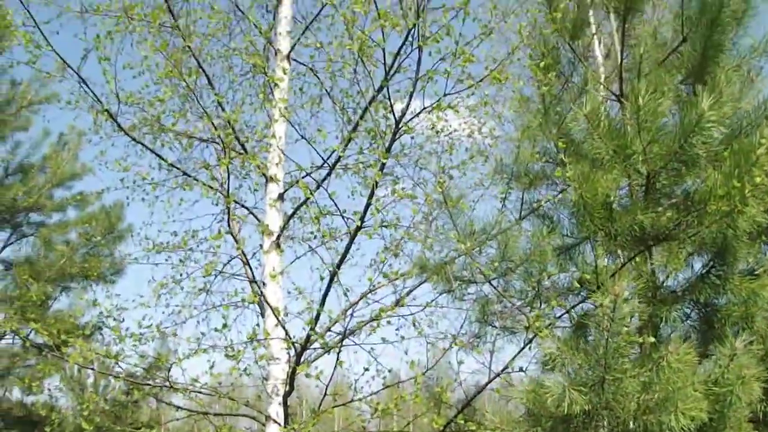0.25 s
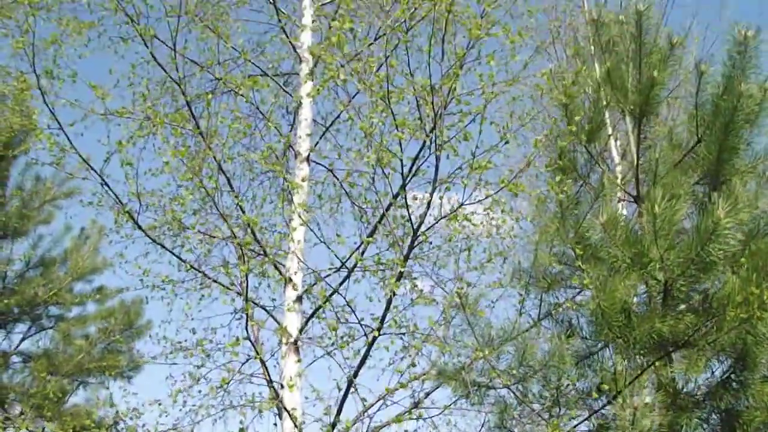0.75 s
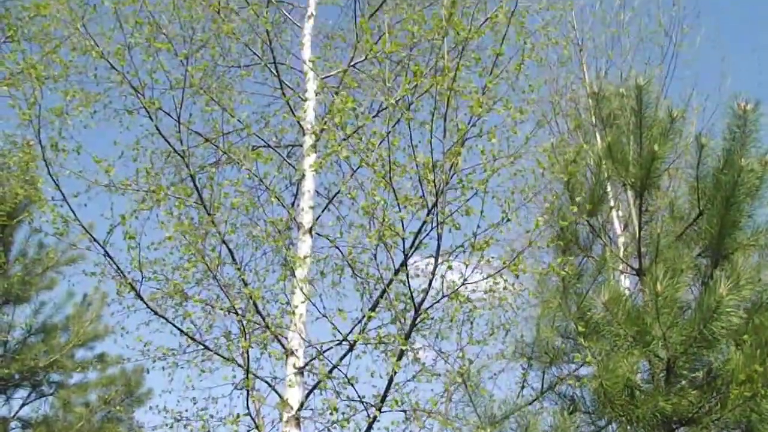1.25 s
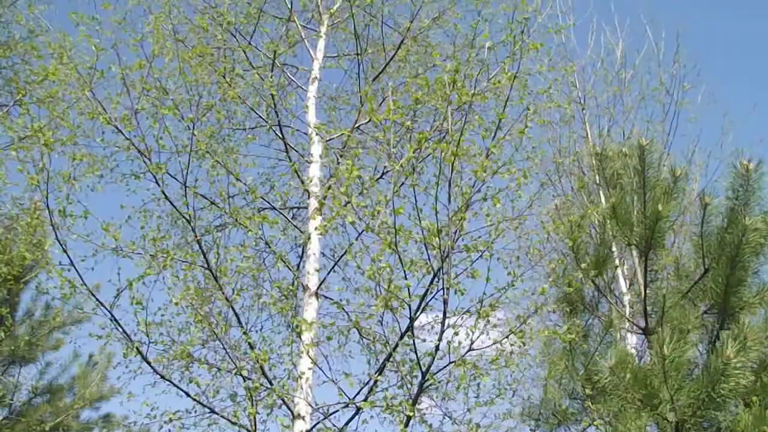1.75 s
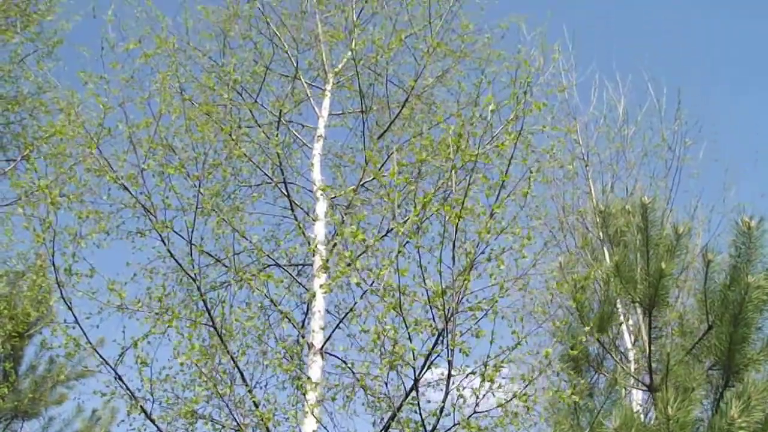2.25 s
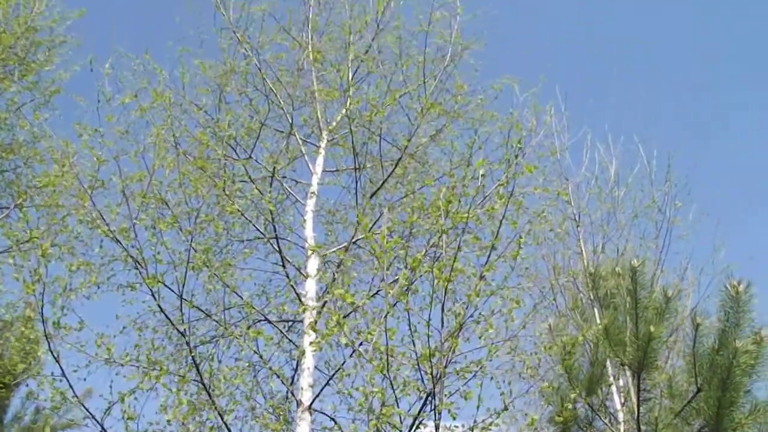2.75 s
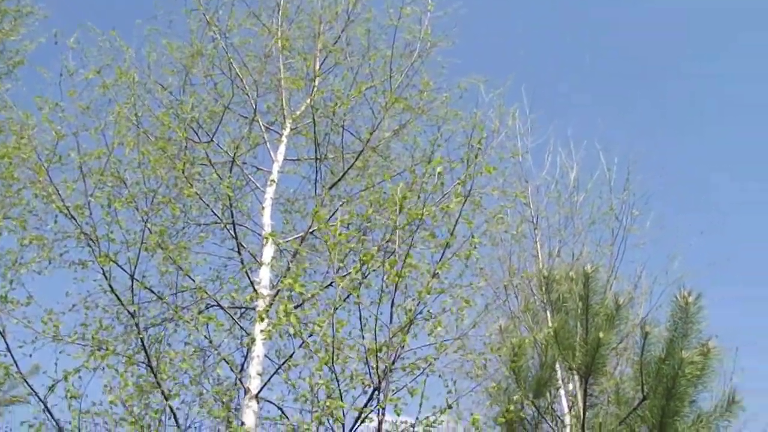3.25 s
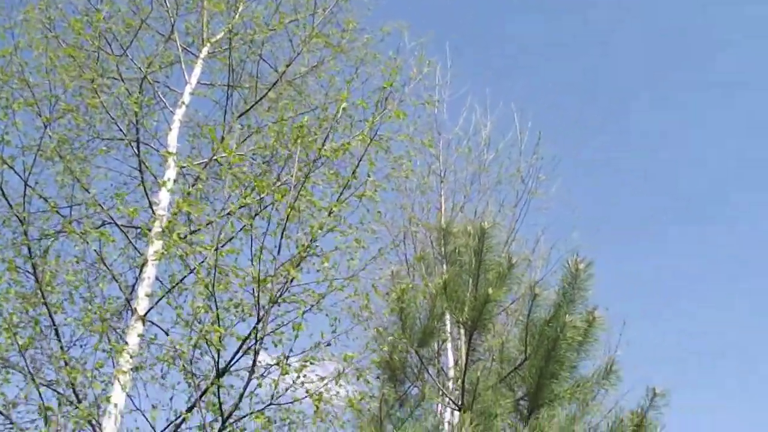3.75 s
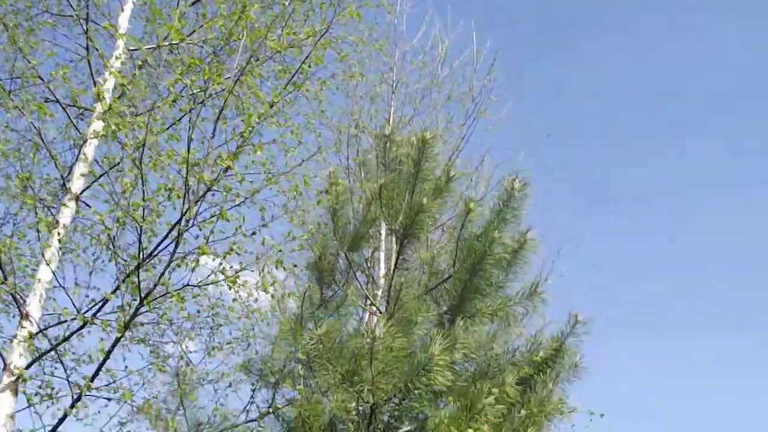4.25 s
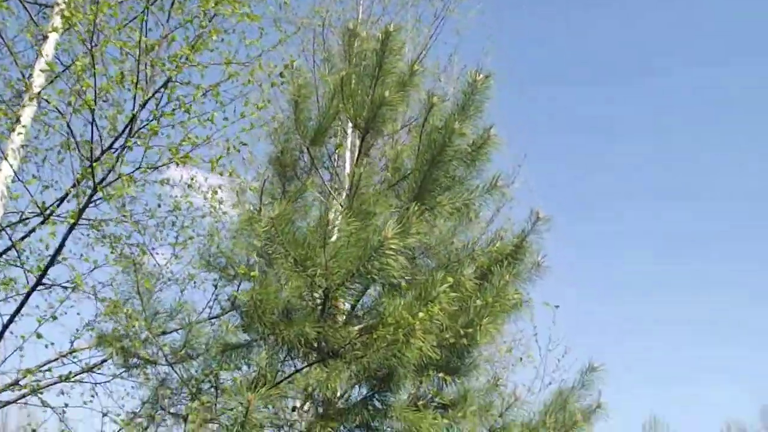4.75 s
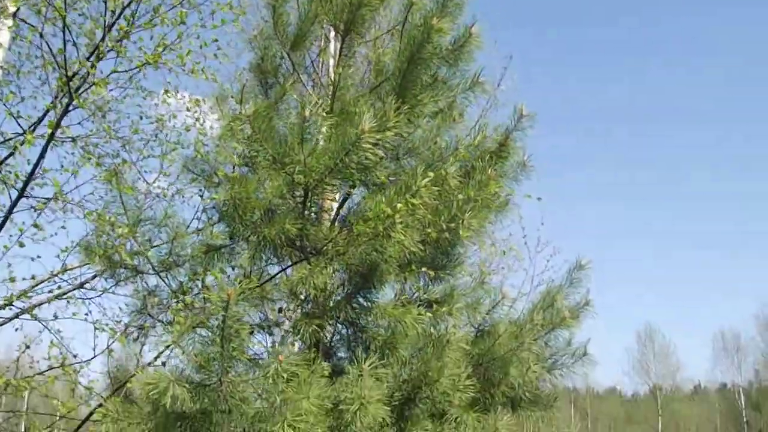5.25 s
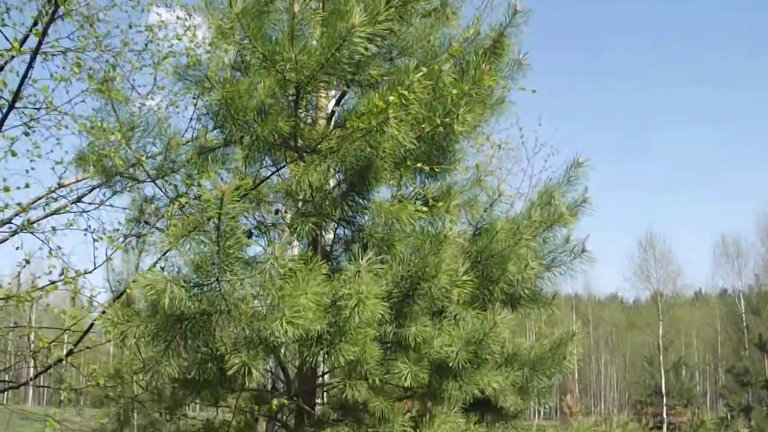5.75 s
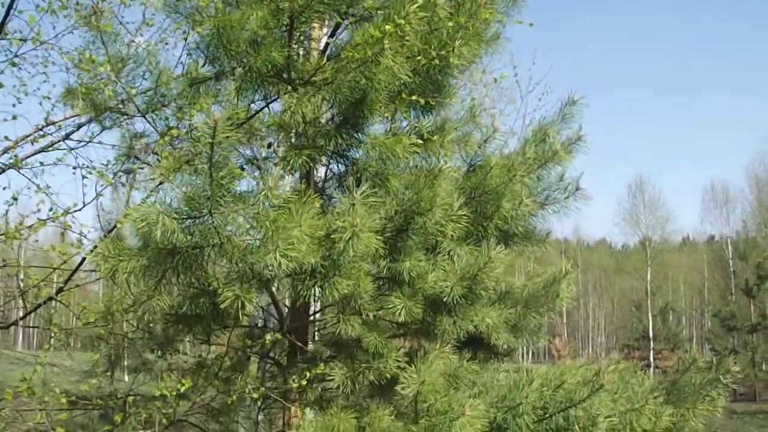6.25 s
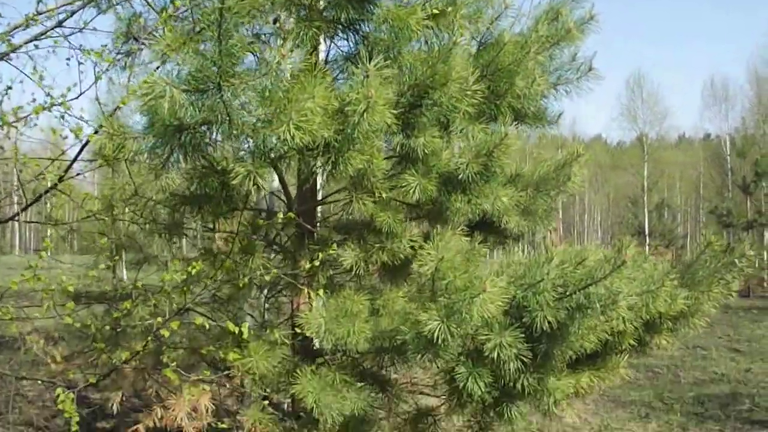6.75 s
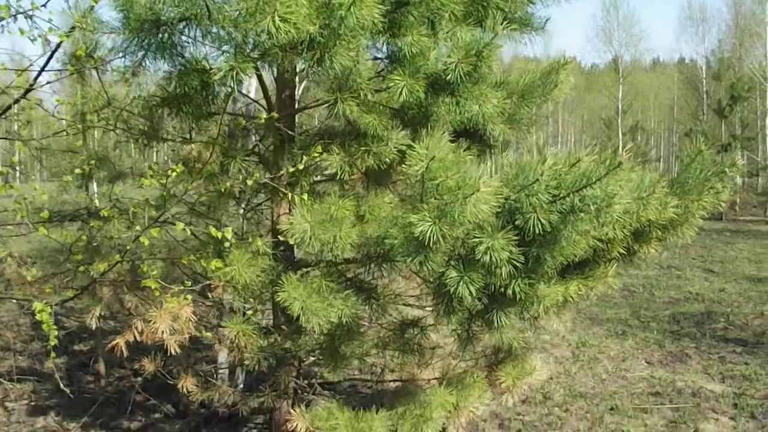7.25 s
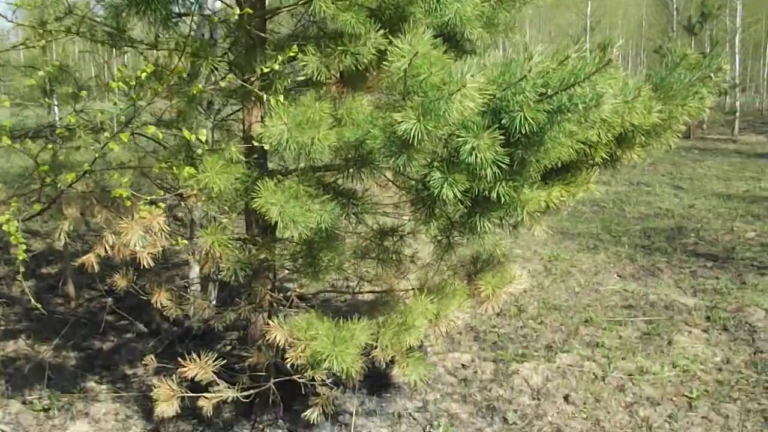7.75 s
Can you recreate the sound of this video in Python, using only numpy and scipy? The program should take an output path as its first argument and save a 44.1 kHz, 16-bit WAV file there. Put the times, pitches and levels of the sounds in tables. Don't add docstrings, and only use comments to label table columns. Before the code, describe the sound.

In open spring woodland, a small camera's drive whirrs continuously right at the microphone, with faint low servo hum in surges and soft hiss. Several sharp plastic snaps come early, the last one loudest. Then a distant warbler whistles a rippling, generally falling phrase for about three seconds. Afterwards only the whirr and small finger ticks remain.

```python
import sys
import numpy as np
from scipy import signal
from scipy.fft import rfft, irfft
from scipy.io import wavfile
from scipy.ndimage import uniform_filter1d, map_coordinates

SR = 44100
rng = np.random.default_rng(int(sys.argv[2]) if len(sys.argv) > 2 else 0)


def store_pcm(level_fs):
    pcm = np.round(np.clip(level_fs, -1, 1) * 32767).astype(np.int16)
    wavfile.write(sys.argv[1], SR, np.atleast_2d(pcm).T)


def gain_from_db(level_db):
    decades = np.asarray(level_db, float) / 20
    return 10 ** decades


N = 353241


def unit(x):
    return x / np.sqrt(np.mean(x ** 2) + 1e-20)


def curves(rows):
    s, *columns = np.transpose(rows)
    return [np.interp(np.arange(N) / SR, s, column) for column in columns]


def wobble(rate):
    knots = rng.standard_normal(int(N * rate / SR) + 4)
    return map_coordinates(knots, [np.arange(N) * rate / SR])


def add(track, start_s, sound):
    spot = track[round(start_s * SR):][:len(sound)]
    spot += sound[:len(spot)]


def colour(hz, tilt, modes):
    tilt_hz, tilt_db = np.transpose(tilt)
    slope_db = np.interp(np.log(hz + 1), np.log(tilt_hz), tilt_db, right=-120)
    bells_db = sum(db / (1 + (2 * (hz - centre) / width) ** 2) for centre, width, db in modes)
    return gain_from_db(slope_db + bells_db)


def patchy(depth_db):
    z = signal.stft(rng.standard_normal(N), nperseg=512)[2]
    field = uniform_filter1d(rng.standard_normal(z.shape), size=6, axis=0)
    field = uniform_filter1d(field, size=8, axis=1)
    return signal.istft(z * gain_from_db(depth_db * unit(field)), nperseg=512)[1][:N]


# pitch_hz, level_db [dB per Hz]
HISS_SLOPE = [(15, -5), (60, 1.5), (110, -8), (300, -11), (600, -15.5), (2000, -23), (5500, -19.5),
              (8000, -19), (9500, -23), (10000, -26), (14500, -27.5), (15700, -27), (20000, -45)]
# pitch_hz, width_hz, level_db
HISS_HUMPS = [(6600, 550, 3), (6800, 400, 0.5), (9300, 310, 6), (6480, 130, -6), (8700, 400, 0.5)]


def hiss():
    hz = np.fft.rfftfreq(N, 1 / SR)
    floor = irfft(rfft(patchy(depth_db=0.7)) * colour(hz, HISS_SLOPE, HISS_HUMPS), N)
    return gain_from_db(-54) * unit(floor)


LINE_HZ = [29.6, 224.8, 2005.3, 6016.2, 8021.4, 10828.8, 11472.3]
# level_db [rms], unsteadiness_db
LINE_LEVELS = [(-59.5, 1.3), (-67.5, 0.9), (-61.5, 0.3), (-77, 2.3), (-73.5, 0.23), (-90, 0.33), (-75.5, 1)]


def drive_tones():
    t = np.arange(N) / SR
    lines = np.zeros(N)
    for hz, (level_db, shake_db) in zip(LINE_HZ, LINE_LEVELS):
        lines += gain_from_db(level_db + shake_db * wobble(5.9)) * np.sin(2 * np.pi * hz * t)
    return np.sqrt(2) * lines


# middle_s, pitch_hz, level_db [peak rms]
SERVO_SURGES = [(0.04, 50, -59), (.33, 59.7, -58.5), (.65, 52.8, -55), (1.28, 49.6, -63), (1.54, 69, -56),
                (1.831, 71.2, -59), (2.72, 58.8, -56), (2.94, 70, -62), (3.27, 62, -60.5), (3.57, 66, -57),
                (4.2, 48, -65), (4.531, 70, -57), (4.78, 65.7, -60), (5.1, 61.5, -56), (5.27, 56, -58),
                (5.76, 53, -56), (6.03, 56.5, -57), (6.33, 58.8, -57.5), (6.95, 54.7, -57), (7.17, 55, -60),
                (7.52, 59, -57), (7.68, 54, -65), (7.9, 56, -59)]


def servo_surges():
    half_s = 0.1
    lead = SR // 4
    hum = np.zeros(N + lead)
    near = (np.arange(2 * lead) - lead) / SR
    for middle_s, hz, level_db in SERVO_SURGES:
        swell = np.exp(-(near / half_s) ** 2)
        add(hum, middle_s, gain_from_db(level_db) * swell * np.sin(2 * np.pi * hz * near))
    return np.sqrt(2) * hum[lead:]


# pitch_hz, level_db [dB per Hz]
CASING_SLOPE = [(500, -29.5), (800, -21), (1100, -13), (1500, -4.5), (2300, -8.5), (3300, -7.5),
                (4000, -9.5), (4700, -10.5), (5100, -23.5), (5600, -54)]
# pitch_hz, width_hz, level_db
CASING_MODES = [(1058, 52, 5), (1338, 49, 4.5), (1536.5, 111, 9.5), (1701, 214, -9.5), (1280, 33, -0.5),
                (1784, 63, 2), (2090, 130, 0.5), (2396, 70, -2.5), (2410, 86, 2), (2600, 75, 1.5),
                (2230, 530, 1.5), (2678, 166, 4.5), (2768, 66, -19), (3006, 100, -11.5), (3220, 170, 2.5),
                (3410, 186, 6), (3645, 480, -6.5), (4020, 190, 8), (4280, 150, -3.5), (4590, 380, 3)]
# time_s, load_db, tightness_db [from low modes to middle ones]
DRIVE_LOAD = [(0.0, 0.9, -0.1), (.45, 0, -0.5), (.75, -0.5, 0.5), (1.4, 0.6, 1), (1.65, 1, -0.5),
              (2.18, -1.6, 0), (2.52, -3.5, 0.5), (2.76, -1, -0.5), (3.01, -1.7, -0.3), (3.25, -0.5, -0.5),
              (3.9, 0, -0.6), (4.3, 0, -0.2), (5.28, 0.7, 0), (5.88, 1, 1), (6.39, -.4, -0.9),
              (6.9, 0.8, -0.6), (7.33, 0.5, 0.5), (8.0, .5, -0.5)]
# middle_s, half_length_s, change_db
DRIVE_SLACK = [
    (2.52, 0.033, -5),
    (2.632, .035, -8),
    (2.71, 0.042, 3),
    (2.85, 0.015, -12),
    (2.994, 0.037, -8),
    (3.046, 0.036, 5.5),
]
# level_db [rms], load_share, tightness_share, slack_share
MODE_GROUPS = [
    (-48, 1, -0.88, 0.44),
    (-43, 0.48, 0.9, 0.15),
    (-51.5, 0.42, -0.029, 0.79),
]


def whirr():
    chatter = patchy(depth_db=0.5) * gain_from_db(0.7 * wobble(60) + 0.28 * wobble(9))
    hz = np.fft.rfftfreq(N, 1 / SR)
    body = rfft(chatter) * colour(hz, CASING_SLOPE, CASING_MODES)
    above_low, above_mid = (1 / (1 + np.exp((edge - hz) / 120)) for edge in (2300, 3700))
    bands = [1 - above_low, above_low - above_mid, above_mid]

    t = np.arange(N) / SR
    slack_db = sum(db * np.exp(-((t - s) / half) ** 2) for s, half, db in DRIVE_SLACK)
    load_db, tight_db = curves(DRIVE_LOAD)
    out = np.zeros(N)
    for (level_db, load, tight, slack), band in zip(MODE_GROUPS, bands):
        gain = gain_from_db(level_db + load * load_db + tight * tight_db + slack * slack_db)
        out += gain * unit(irfft(body * band, N))
    return out


# start_s, level_db [peak], pitch_hz, fade_cycles
FINGER_TICKS = [(1.983, -46, 895, 2.5), (2.152, -48, 960, 3.7), (2.738, -46, 1050, 3),
                (5.667, -38.5, 754, 1), (5.668, -38, 1420, 1.7), (5.668, -44.5, 351, 0.96),
                (6.165, -48, 750, 2.5), (6.185, -50, 520, 2), (6.518, -47, 750, 1.7), (5.41, -44, 2000, 2),
                (6.665, -41.5, 800, 1.26), (6.976, -47, 300, 0.79), (6.975, -41, 900, 2),
                (7.285, -44.5, 690, 1), (7.53, -49, 402, 1.7), (7.9267, -44, 802, 1.3),
                (7.9339, -37, 818, 1.3), (7.95, -52, 300, 1.7)]
# start_s, level_db [peak], pitch_hz, fade_cycles
FINGERNAIL_TICKS = [(6.49, -51, 10500, 3.8), (6.95, -49, 8700, 8.8), (6.9746, -33, 8000, 1),
                    (6.9746, -52, 13000, 2.5), (6.978, -35, 7500, 2.2), (7.1437, -36, 6740, 5.1),
                    (7.1438, -39, 9700, 6), (7.1438, -46, 12800, 5), (7.1438, -49, 15100, 4)]
# start_s, level_db [peak], pitch_hz, fade_cycles
SNAP_RINGS = [(1.231, -33, 5640, 3), (1.2308, -33, 7200, 3), (1.2343, -23, 3000, 7),
              (1.2352, -31, 2200, 7), (1.5702, -41, 5700, 4), (1.5725, -36, 3400, 8),
              (1.71, -41, 700, 1.1), (1.5702, -47, 10200, 4), (1.71, -42, 5200, 4),
              (1.7124, -31, 1600, 11), (1.7128, -32, 2450, 8), (2.9115, -28, 2870, 12),
              (3.1464, -42, 300, 1.4), (3.146, -36, 11800, 5), (3.146, -46.5, 14200, 5),
              (3.1461, -33, 6700, 5), (3.1497, -23, 1285, 2), (3.1497, -25, 3200, 5),
              (3.153, -37, 950, 3.5)]


def ticks():
    out, t = np.zeros(N), np.arange(SR // 12) / SR
    for start_s, level_db, hz, cycles in FINGER_TICKS + FINGERNAIL_TICKS + SNAP_RINGS:
        u = 2 * t * hz / cycles
        add(out, start_s, gain_from_db(level_db) * u * np.exp(1 - u) * np.sin(2 * np.pi * hz * t))
    return out


# start_s, rise_s, in_step_s [modes align, after start], slip_s, tail_db, tail_t60_s
CASING_SNAPS = [
    (1.2308, 0.0006, .00618, 0.0042, -11, 0.042),
    (1.5699, 0.0007, .00348, 0.003, -11, 0.05),
    (1.7096, 0.00064, .00425, 0.003, -10.5, 0.055),
    (2.907, 0.0012, .00517, 0.0042, -10, 0.05),
    (3.146, 0.00027, .00455, 0.0027, -14, 0.026),
]
# pitch_hz, level_db [peak]
WOKEN_MODES = [
    [(920, -32), (1590, -30.5), (2013, -22), (2254, -24), (2582, -20), (3000, -13.5), (3300, -27),
     (3700, -38), (4200, -29), (4450, -35), (6900, -48)],
    [(1050, -40), (1497, -31), (1980, -22), (2600, -21), (3030, -22), (3230, -28), (4106, -36), (4450, -41),
     (8200, -48)],
    [(620, -38), (940, -40), (1439, -29.5), (1775, -20), (2232, -22.5), (2768, -19), (3445, -26.5),
     (4890, -43.8), (7400, -46)],
    [(810, -56), (1000, -43), (1711, -27), (1922, -25.5), (2631, -32), (2870, -16), (3357, -37),
     (4650, -46), (5600, -50)],
    [(750, -38), (990, -20.3), (1257, -16.5), (1499, -13), (1985, -11), (2425, -13.5), (2758, -17.5),
     (2989, -17.5), (3374, -17), (3899, -26), (4300, -31), (4800, -32), (5400, -38), (8460, -26)],
]
CRACK_LEVELS = [-39, -41, -44, -52, -18]
# pitch_hz, level_db [dB per Hz]
CRACK_SLOPE = [(20, -60), (3000, -28), (4500, -15), (8500, 17), (10500, 1), (13000, -34), (17000, -22)]


def snaps():
    out, t = np.zeros(N), np.arange(SR // 20) / SR
    hz = np.fft.rfftfreq(len(t), 1 / SR)
    for snap, modes, crack_db in zip(CASING_SNAPS, WOKEN_MODES, CRACK_LEVELS):
        start_s, rise_s, in_step_s, slip_s, tail_db, t60_s = snap
        noise = rng.standard_normal(len(t))
        bright = unit(irfft(rfft(noise) * colour(hz, CRACK_SLOPE, []), len(t)))
        decay = np.exp(-(t / .0015) ** 2) + gain_from_db(-16 - 60 * t / .015)
        add(out, start_s, gain_from_db(crack_db) * (1 - np.exp(-t / .0002)) * decay * bright)

        onset = 1 - np.exp(-(t / rise_s) ** 2)
        held = np.exp(-(t / slip_s) ** 6)
        for mode_hz, mode_db in modes:
            ring = gain_from_db(tail_db - 60 * t / t60_s * np.sqrt(mode_hz / 2000))
            rattle = np.interp(t * 550, np.arange(40), rng.standard_normal(40))
            after = (1 - held) * ring * rattle * gain_from_db(1.5)
            swing = -np.cos(2 * np.pi * mode_hz * (t - in_step_s) + rng.normal(0, .12))
            add(out, start_s, gain_from_db(mode_db) * onset * (held * (1 + .06 * rattle) + after) * swing)
    return out


# start_s, length_s, from_hz, to_hz, level_db [loudest rms]
SETTLING_NOTES = [(2.582, .056, 5300, 5650, -63), (2.749, .039, 5040, 5620, -66),
                  (2.925, .037, 5050, 5560, -60.5), (3.2, .026, 4000, 3200, -41),
                  (3.23, .045, 7100, 4900, -58), (3.47, .026, 3900, 3250, -40.5),
                  (4.103, .026, 4290, 3120, -36), (4.208, .026, 4100, 3020, -36.5),
                  (4.255, .022, 3120, 3010, -43.5), (4.312, .025, 4160, 3110, -37.5),
                  (4.414, .036, 4300, 2990, -36), (4.532, .024, 4200, 3110, -41.5),
                  (5.586, .055, 4220, 2900, -40.5), (5.811, .04, 4200, 3020, -42),
                  (5.892, .04, 1620, 1150, -45)]
FLICKED_NOTES = [(3.555, .057, 3940, 4500, -51), (3.615, .018, 3270, 3000, -42.5),
                 (4.842, .036, 3460, 3380, -45), (4.784, .054, 3330, 3450, -39),
                 (5.062, .063, 3350, 3150, -39.5), (5.11, .055, 2970, 3350, -46),
                 (5.553, .014, 3300, 4000, -46), (3.575, .016, 3250, 3400, -45),
                 (5.738, .046, 2920, 4200, -47), (5.934, .043, 3070, 2430, -46)]
HOOKED_NOTES = [
    (3.685, .063, 3880, 4680, -38.5),
    (3.812, .066, 3900, 4620, -38.5),
    (3.948, .058, 3930, 4780, -41),
]
SLIDING_NOTES = [(2.975, .045, 5250, 6300, -63), (3.165, .035, 5050, 5950, -62.5),
                 (3.185, .014, 5750, 5920, -62), (3.357, .047, 4950, 6250, -59.5),
                 (3.428, .036, 6950, 4700, -62), (3.405, .022, 6500, 6950, -68),
                 (4.95, .027, 3800, 4550, -54), (5.07, .035, 2550, 2900, -47),
                 (3.596, .018, 4150, 4520, -49), (4.148, .049, 4400, 3430, -51),
                 (4.795, .023, 3080, 2810, -41.5), (4.882, .036, 3430, 2800, -38.5),
                 (4.977, .06, 4500, 3650, -54), (5.005, .057, 3220, 3430, -40),
                 (5.243, .047, 2800, 3180, -43), (5.14, .035, 2980, 3600, -45),
                 (5.085, .04, 3100, 2900, -46), (4.175, .022, 3850, 3450, -46.5),
                 (5.588, .014, 4050, 3600, -45), (5.812, .012, 3950, 3500, -47),
                 (3.218, .016, 7050, 6900, -66), (3.6, .025, 6500, 5750, -66),
                 (3.495, .018, 2750, 3200, -47), (3.625, .02, 2500, 3000, -48),
                 (3.455, .02, 4900, 3900, -52), (3.603, .014, 4300, 3400, -49),
                 (4.39, .025, 2500, 2250, -48), (5.405, .018, 2900, 3030, -43),
                 (5.53, .026, 2900, 3300, -42.5),
                 (5.93, .03, 1200, 1500, -50), (5.985, .05, 1480, 1540, -43.5),
                (6.025, .042, 2940, 3400, -39.5), (6.168, .022, 3000, 3500, -44),
                (6.243, .03, 3420, 3180, -45), (6.253, .045, 2790, 3125, -43.5),
                (3.675, .012, 3680, 3900, -47), (3.225, .018, 2600, 3400, -45),
                (5.612, .03, 4080, 3880, -50), (5.58, .018, 2500, 2750, -43),
                (5.684, .02, 3400, 3100, -46.5), (5.76, .035, 3100, 3250, -45),
                (5.885, .018, 3200, 3380, -44), (5.77, .015, 3600, 4100, -49),
                (7.665, .018, 3350, 2950, -44), (6.372, .026, 3200, 3400, -45)]
ARCHED_NOTES = [
    (4.288, .083, 4060, 4360, -55),
    (4.482, .066, 4230, 4320, -54),
    (4.655, .065, 1180, 1370, -46),
    (5.785, .024, 3100, 3270, -45),
]
# pitch_hz, level_db
PITCH_CARRY = [(1150, -11), (1500, -5), (2400, -5), (2950, -4.5), (3130, 0), (3300, -1), (3500, -5),
               (3800, -6.5), (4300, -11.5), (5000, -12), (7400, -21)]


def warbler():
    song, fade_s = np.zeros(N), .007
    settle_bend, flick_bend = 2.8, 4.5
    hook_sag, swell_db = .09, 4
    gestures = [
        (SETTLING_NOTES, lambda u: 1 - (1 - u) ** settle_bend),
        (FLICKED_NOTES, lambda u: u ** flick_bend),
        (HOOKED_NOTES, lambda u: u ** flick_bend - hook_sag * np.sin(np.pi * u)),
        (SLIDING_NOTES, lambda u: u),
        (ARCHED_NOTES, lambda u: np.sin(np.pi * u)),
    ]
    for notes, glide in gestures:
        for start_s, length_s, from_hz, to_hz, loudest_db in notes:
            t = np.arange(-fade_s / 2, length_s + fade_s / 2, 1 / SR)
            u = np.clip(t / length_s, 0, 1)
            hz = from_hz + (to_hz - from_hz) * glide(u)
            db = np.interp(hz, *np.transpose(PITCH_CARRY)) - swell_db * (2 * u - 1) ** 2
            edge = np.clip(np.minimum(t - t[0], t[-1] - t) / fade_s, 0, 1)
            level = gain_from_db(loudest_db + db - db.max()) * np.sqrt(2) * np.sin(np.pi / 2 * edge) ** 2
            add(song, start_s - fade_s / 2, level * np.sin(2 * np.pi * np.cumsum(hz) / SR))
    song *= gain_from_db(1.1 * wobble(70))
    trees = rng.standard_normal(SR // 4) * gain_from_db(-60 * np.arange(SR // 4) / SR / .25)
    smear = signal.fftconvolve(song, trees / np.linalg.norm(trees))[:N]
    return song + gain_from_db(-12.5) * smear


def scene():
    camera = drive_tones() + servo_surges() + whirr() + ticks() + snaps()
    return np.tile(hiss() + camera + warbler(), (2, 1))


def low_pass(x):
    return signal.sosfilt(signal.butter(12, 16550, fs=SR, output="sos"), x)


def record(dry):
    soft = dry / (1 + np.abs(dry / .93) ** 5) ** (1 / 5)
    pair = np.array([np.roll(soft[0], shift=1), soft[1]])
    below = 1 / (1 + np.exp((np.fft.rfftfreq(N, 1 / SR) - 15790) / 12))
    return low_pass(irfft(rfft(pair) * below, N))


dry = scene()
out = record(dry)
store_pcm(out)
```